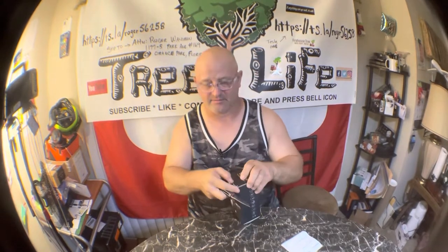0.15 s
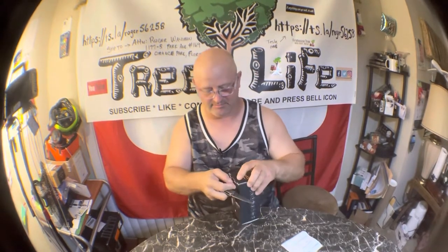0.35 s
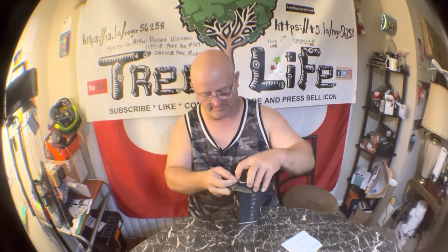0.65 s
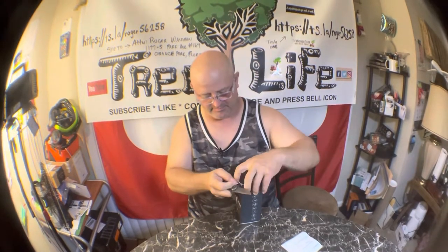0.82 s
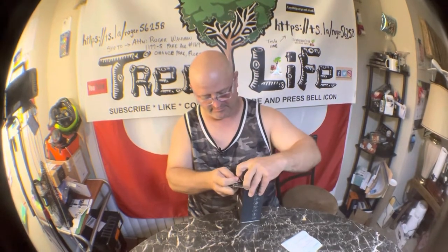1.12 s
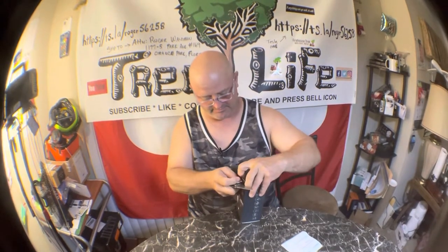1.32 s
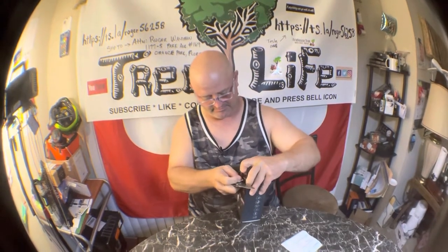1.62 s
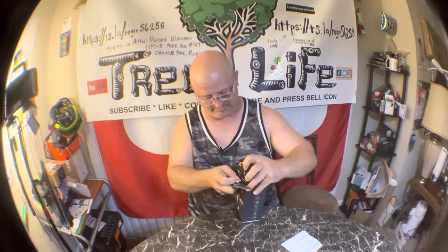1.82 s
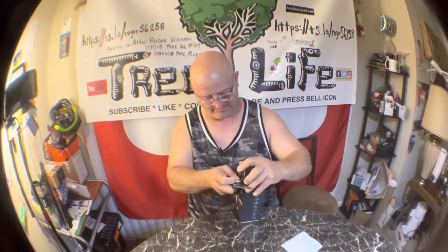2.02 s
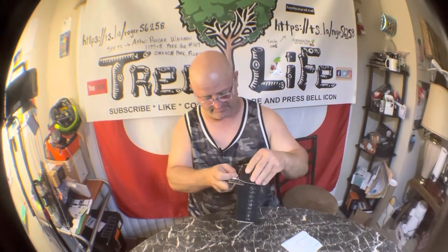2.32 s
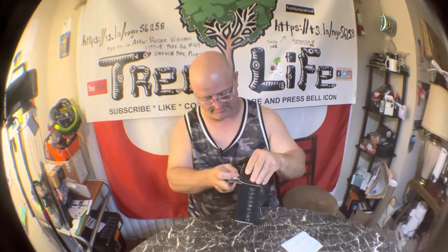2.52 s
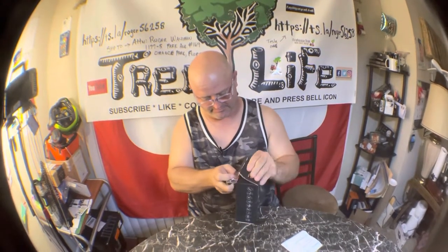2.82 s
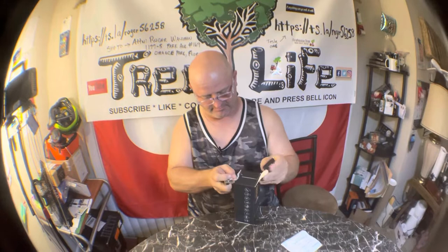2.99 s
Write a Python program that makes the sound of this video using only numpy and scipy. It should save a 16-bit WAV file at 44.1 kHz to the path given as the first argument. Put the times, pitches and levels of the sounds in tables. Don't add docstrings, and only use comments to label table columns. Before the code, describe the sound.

Cardboard box seal cut by blade: soft rubbing and faint crinkles, thickening ticks, sharp cracks midway, quieter scraping, then a hard snap with a table knock and final splintering, in a small room with short echo.

```python
import sys
import numpy as np
from scipy import signal
from scipy.fft import rfft, irfft
from scipy.io import wavfile
from scipy.ndimage import uniform_filter1d

SR = 44100
rng = np.random.default_rng(int(sys.argv[2]) if len(sys.argv) > 2 else 0)


def gain_from_db(level_db):
    decades = np.asarray(level_db, float) / 20
    return 10 ** decades


def bounce(signal):
    frames = np.transpose(np.atleast_2d(signal))
    limited = np.clip(frames, -1, 1)
    pcm = np.round(limited * 32767).astype(np.int16)
    wavfile.write(sys.argv[1], SR, pcm)


N = 138915


def evened(x):
    return x / np.sqrt(np.mean(x ** 2) + 1e-20)


def read(points, hz):
    point_hz, value = np.transpose(points)
    return np.interp(np.log(hz + 1), np.log(point_hz + 1), value)


def add(track, start_s, sound):
    part = track[round(start_s * SR):][:len(sound)]
    part += sound[:len(part)]


def play(events, make_sound):
    track = np.zeros(N)
    for start_s, *details in events:
        add(track, start_s, make_sound(*details))
    return track


def smooth_twice(x, size, axis=-1):
    return uniform_filter1d(uniform_filter1d(x, size, axis=axis), size, axis=axis)


def colour(x, points):
    level_db = read(points, abs(np.fft.fftfreq(8192, 1 / SR)))
    log_gain = np.log(gain_from_db(np.maximum(level_db, -100)))
    taps = np.fft.ifft(np.exp(np.conj(signal.hilbert(log_gain)))).real[:4096]
    return signal.oaconvolve(x, taps / np.linalg.norm(taps))[:len(x)]


def ring(hz, t60_s, t):
    swell_cycles = 0.84
    swell = (1 - np.exp(-t * hz / swell_cycles)) ** 2
    return np.sin(2 * np.pi * hz * t) * gain_from_db(-t / t60_s * 60) * swell


# pitch_hz [Hz], level_db [dB]
AIR_SPECTRUM = [(20, 12.5), (42, 7), (62, -3.5), (550, -20), (1600, -31), (4300, -46), (9000, -41.5),
                (16000, -52)]


def air():
    gain = gain_from_db(read(AIR_SPECTRUM, np.fft.rfftfreq(N, 1 / SR)))
    return gain_from_db(-35.5) * evened(irfft(rfft(rng.standard_normal(N)) * gain, N))


# pitch_hz [Hz], t60_s [s to fall 60 dB]
ECHO_TIMES = [(600, 0.17), (4000, 0.2), (12000, 0.046)]


def room(x):
    taps = np.zeros(SR // 2)
    at = np.arange(200, SR // 2 - 20, 20)
    taps[at + rng.integers(0, 20, len(at))] = rng.choice([-1., 1.], len(at))
    hz, t, bands = signal.stft(taps, SR, nperseg=256)
    fade = gain_from_db(-60 * t / read(ECHO_TIMES, hz)[:, None])
    tail = signal.istft(bands * fade, SR, nperseg=256)[1]
    return signal.fftconvolve(x, tail / np.linalg.norm(tail))[:N]


def grit(catches_per_s, spread_db, share):
    size = gain_from_db(spread_db * np.minimum(rng.exponential(1, N), 2.5))
    catches = size * (rng.random(N) < catches_per_s / SR)
    catches = signal.lfilter([1], [1, -.97], catches) * rng.standard_normal(N)
    flutter_db = 2.0 * evened(smooth_twice(rng.standard_normal(N), 300))
    return (share * evened(catches) + (1 - share) * rng.standard_normal(N)) * gain_from_db(flutter_db)


# start_s [s], length_s [s], level_db [dB]
CRINKLES = [
    (.655, 0.11, -47.5),
    (0.996, .05, -49),
    (1.22, 0.056, -49),
    (2.033, 0.12, -51.5),
]
# pitch_hz [Hz], level_db [dB per Hz]
CRINKLE_SPECTRUM = [(800, -54), (1200, 2), (2100, 4), (3000, -14), (4200, -34)]


def crinkle():
    def swell(length_s, level_db):
        return gain_from_db(level_db) * np.hanning(round(length_s * SR)) ** .5

    return play(CRINKLES, swell) * evened(colour(grit(700, 3.5, .6), CRINKLE_SPECTRUM))


# start_s [s], length_s [s], from_hz [Hz], to_hz [Hz], level_db [dB]
SQUEAKS = [
    (.57, .06, 14100, 15900, -69),
    (.795, .025, 15800, 14000, -68),
]


def squeak(length_s, from_hz, to_hz, level_db):
    hz = np.linspace(from_hz, to_hz, round(length_s * SR))
    return gain_from_db(level_db) * np.hanning(len(hz)) ** .5 * np.sin(2 * np.pi * np.cumsum(hz) / SR)


def patchy(x, patch_db):
    bands = signal.stft(x, nperseg=256)[2]
    field = rng.standard_normal(bands.T.shape)
    field = uniform_filter1d(uniform_filter1d(field, size=14, axis=0), size=7, axis=1)
    return evened(signal.istft(bands * gain_from_db(patch_db * evened(field).T), nperseg=256)[1][:N])


def linger(level):
    let_go_s = 0.011
    keep = np.exp(-1 / (let_go_s * SR))
    return np.maximum(level, signal.lfilter([1 - keep], [1, -keep], level))


# start_s [s], length_s
# [s], hiss_db [dB], card_db [dB], peak_place [0-1 of the stroke]
STROKES = [(0.0, 0.27, -53.5, -57, 0.04), (0.09, 0.1, -44, -35.5, 0.58), (0.171, 0.12, -52, -43, .3),
           (0.264, 0.12, -53.5, -48, 0.29), (0.363, 0.039, -56, -46, 0.47), (0.384, 0.14, -47.5, -48, 0.55),
           (0.486, 0.11, -50.5, -50, 0.33), (0.558, 0.15, -54, -49, 0.38), (0.652, 0.082, -44, -40.5, 1),
           (0.748, 0.053, -57.5, -49, 0.43), (0.805, 0.11, -44, -47, 0.33), (0.9, 0.1, -52.5, -45, 0),
           (0.999, 0.21, -52.5, -45, 0), (1.142, 0.12, -56, -45.5, 0.64), (1.224, 0.046, -44, -38, 0.65),
           (1.276, 0.16, -71, -54.5, 0.07),
           (1.5187, 0.037, -39.5, -30.5, 0.66), (2.75, 0.031, -40.5, -35, 0.35),
         (1.538, 0.21, -42, -35.5, 0.15), (1.697, 0.085, -43, -35.5, 0.86), (1.79, 0.082, -43, -38, 0),
         (1.854, 0.47, -61, -48, 0), (1.997, 0.13, -50.5, -51, 1), (2.138, 0.18, -52.5, -43.5, 0.8),
         (2.283, 0.14, -45, -48.5, 0.71), (2.398, 0.17, -60, -49, 0.31), (2.496, 0.14, -53, -45, 0.31),
         (2.55, 0.29, -47.5, -38, 0.91), (2.772, 0.17, -58, -49.5, 0.48), (2.852, 0.15, -46, -55, 0.8),
         (2.976, 0.059, -46.5, -53, 0.4), (3.021, 0.12, -55, -75, 0.12)]
# pitch_hz [Hz], level_db [dB per Hz]
HISS_SPECTRUM = [(1800, -33), (3200, -11), (4500, -12.5), (5700, -3), (8200, -0.5), (10500, -3),
                 (12500, -13), (16000, -16.5)]
# pitch_hz [Hz], level_db [dB per Hz]
CARD_SPECTRUM = [(88, -18.5), (150, -7.5), (556, 0), (851, -11), (1120, -3.5), (1380, -6), (1730, -7),
                 (2370, -13), (4500, -25), (5850, -30), (9900, -120)]


def strokes():
    hiss_level, card_level = np.zeros(N), np.zeros(N)
    for start_s, length_s, hiss_db, card_db, peak in STROKES:
        u = np.linspace(0, 1, round(length_s * SR))
        peak = np.clip(peak, .05, .95)
        rise_and_fall = np.minimum(u / peak, (1 - u) / (1 - peak))
        shape = np.sin(np.pi / 2 * rise_and_fall) ** 1.72
        add(hiss_level, start_s, gain_from_db(hiss_db) * shape)
        add(card_level, start_s, gain_from_db(card_db) * shape)
    fizz = patchy(colour(grit(810, 9.5, 0.19), HISS_SPECTRUM), 2.2)
    rasp = patchy(colour(grit(600, 1.9, 0.38), CARD_SPECTRUM), 2.2)
    return linger(hiss_level) * fizz + linger(card_level) * rasp


# pitch_hz [Hz], level_db [dB], t60_s [s to fall 60 dB]
BOX_MODES = [(640, -19, 0.0079), (1100, -11, 0.048), (1850, -3.5, 0.017), (2662, -7.5, 0.014),
             (3430, -21.5, 0.033)]
# pitch_hz [Hz], level_db [dB per Hz]
CRACK_SPECTRUM = [(1800, -36.5), (3300, -10), (4500, -11.5), (5700, -3), (8200, -0.5), (11500, -7.5),
                  (16000, -12.5)]
BLADE_HZ = 8350


def click(crack_db, card_db, card_hz, thud_db, length=1, blade=.25, blade_hz=BLADE_HZ, rise_s=0.0016,
          tone=CRACK_SPECTRUM):
    t = np.arange(3000) / SR
    bends = rng.uniform(0.919, 1.087, len(BOX_MODES))
    crack_t60_s, ping_t60_s, thud_t60_s, thud_hz = length * 0.0048, 0.011, 0.016, 217.4

    burst = rng.standard_normal(len(t)) * gain_from_db(-60 * t / crack_t60_s)
    crack = colour(burst * (1 - np.exp(-t / rise_s)) ** 2, tone)
    crack = crack / abs(crack).max() + blade * ring(blade_hz * bends[3] ** .5, crack_t60_s, t)

    box = sum(gain_from_db(db) * ring(hz * bend, t60_s, t) for (hz, db, t60_s), bend in zip(BOX_MODES, bends))
    card = ring(card_hz, ping_t60_s, t) + 0.34 * ring(3000 * bends[2], ping_t60_s / 2, t)
    card = card + gain_from_db(-9.5) * box

    thud = ring(thud_hz * bends[0], thud_t60_s, t)
    thud = thud + 0.44 * ring(2.374 * thud_hz * bends[1], thud_t60_s, t)
    parts = ((crack, crack_db + 1.5), (card, card_db + 0.5), (thud, thud_db + 2))
    return sum(gain_from_db(db) * x / abs(x).max() for x, db in parts)


# start_s [s], crack_db [dB], card_db [dB], card_hz [Hz], thud_db [dB]
TICKS = [(0.2124, -50, -30.5, 1350, -54), (0.3276, -50, -34.5, 1140, -29.5),
         (0.3338, -47, -33.5, 1330, -30.5), (0.3763, -50, -37, 1100, -40), (0.417, -47, -35.5, 1260, -36),
         (0.466, -52, -31.5, 1580, -37.5), (0.6639, -50, -37.5, 1360, -39), (0.6777, -49, -34, 1160, -37),
         (0.82, -51, -36.5, 1240, -52), (0.9045, -31.5, -24, 1164, -22.5),
         (0.9115, -36, -21.5, 1630, -25.5), (1.0147, -37.5, -26, 1180, -51), (1.0435, -39, -42, 1550, -36),
         (1.075, -43, -49, 1310, -36), (1.0934, -47, -43, 1770, -49), (1.1084, -29, -36.5, 1420, -35.5),
         (1.1463, -37, -28, 1490, -43), (1.1627, -30, -28, 1660, -32), (1.1818, -31, -26.5, 1460, -55),
         (1.2028, -30, -32, 1570, -34.5), (1.2268, -37, -33, 990, -32), (1.2456, -23.5, -53, 1550, -50),
         (1.291, -53, -44, 1250, -43), (1.3282, -40.5, -38.5, 1400, -34.5), (1.3548, -62, -43.5, 1560, -46),
         (1.4374, -43.5, -41.5, 1350, -35), (1.4825, -47, -39, 1080, -36), (1.4965, -49, -46, 2280, -48),
         (1.5900, -32, -45, 1400, -47), (1.7419, -28, -39, 1940, -47), (1.9848, -43, -37, 1800, -42),
              (2.0981, -40.5, -30, 1580, -60), (2.7245, -29, -29, 1310, -50),
              (1.9564, -30.5, -33.5, 1760, -41), (2.0095, -25, -34, 1330, -37.5),
              (2.038, -41, -30.5, 1570, -35.5), (2.2184, -58, -34.5, 1430, -33.5),
              (2.2337, -33, -33, 1230, -44), (2.2743, -31.5, -25, 1354, -37),
              (2.5134, -29.5, -21.5, 1310, -32), (2.5519, -22.5, -26, 1430, -26),
              (2.5701, -37, -27, 1540, -33), (2.718, -26.5, -19.5, 1330, -32),
              (2.8696, -27, -32.5, 1490, -38), (3.0228, -56, -32, 1310, -39)]


def tick(crack_db, card_db, card_hz, thud_db):
    return click(crack_db, card_db, card_hz, thud_db, blade=0.64, rise_s=0.00073, tone=HISS_SPECTRUM)


# start_s [s], crack_db [dB]
SLIPS = [(.1080, -25.5), (0.1101, -36), (0.1153, -30), (0.118, -26), (0.123, -24), (0.1249, -25),
         (0.1272, -21.5), (0.1324, -22.5), (0.1371, -30), (0.1394, -27), (0.142, -23), (0.146, -26),
         (0.149, -18), (.1530, -18), (0.1575, -21), (0.1627, -19.5)]


def slip(crack_db):
    card_hz = 1276 * rng.uniform(0.935, 1.105)
    return click(crack_db, -28, card_hz, -40, length=0.58, blade=1.8, blade_hz=8600,
                 rise_s=0.00015, tone=HISS_SPECTRUM)


# start_s [s], crack_db [dB], blade_hz [Hz]
SPLINTERS = [
    (2.974, -28, 10100),
    (2.9782, -14.5, 9330),
    (2.9844, -20, 10800),
    (2.9905, -27, 10500),
    (2.9934, -33, 9500),
    (2.996, -26, 8500),
    (2.9996, -22, 8050),
    (3.003, -23.5, 6360),
]


def splinter(crack_db, blade_hz):
    return click(crack_db, crack_db - 21, 1440, crack_db - 42, length=1.4, blade=1.0,
                 blade_hz=blade_hz, rise_s=0.00015)


def bump():
    t = np.arange(SR // 4) / SR
    knock = ring(117, 0.069, t + 0.0035) * np.minimum(t / 0.0024, 1)
    return gain_from_db(-7) * (knock + 1.2 * ring(681, 0.032, t))


# start_s [s], pitch_hz [Hz], peak_db [dB], t60_s [s; each note swells and stops within 0.42 of this]
RINGS = [(0.9297, 1510, -33.5, .01), (1.5314, 1174, -8, 0.016), (1.5332, 2760, -18, 0.022),
         (1.5328, 5040, -15.5, 0.0085), (1.5328, 6270, -19.5, 0.02), (1.6092, 1830, -25, 0.019),
         (1.6082, 5650, -24, .006), (1.6590, 2960, -14.5, 0.015), (1.6621, 3220, -18, .014),
         (1.6607, 5315, -17, 0.014), (1.783, 1750, -30, 0.027), (1.7893, 7320, -11.5, 0.0087),
         (1.7894, 8650, -17.5, 0.0093), (1.7946, 208, -18.5, 0.028), (2.7541, 8600, -13, 0.0066),
         (2.7558, 6300, -5.5, 0.0056), (2.7639, 1185, -8, 0.02), (2.7755, 5770, -37, 0.0062),
         (2.7904, 1140, -23.5, 0.041)]


def swelling_note(hz, peak_db, t60_s):
    held_s = 0.42 * t60_s
    t = np.arange(0, held_s, 1 / SR)
    swell = np.sin(np.pi * (t / held_s) ** 0.5) ** 2
    return gain_from_db(peak_db) * np.sin(2 * np.pi * hz * t) * swell


# start_s [s], crack_db [dB], card_db [dB], card_hz [Hz], thud_db [dB]
SNAPS = [(1.5323, -6, 1.5, 1426, -12), (1.5354, -18, -8.5, 1775, -37), (1.6082, -10, -17.5, 1200, -24.5),
         (1.6583, -7.5, -8.5, 1300, -32), (1.6620, -6, -11, 1323, -22.5), (1.7601, -23, -16, 1650, -39),
         (1.7894, -15, -7.5, 1850, -31), (1.7972, -19.5, -41, 1820, -36), (2.7541, -7, -8, 1430, -15.5),
         (2.7567, -1.5, -5.5, 1100, -16.5), (2.7629, -19.5, -13, 1230, -26)]


def snaps():
    return play(SNAPS, click)


def scene():
    box = strokes() + play(SQUEAKS, squeak)
    box += play(TICKS, tick)
    box += play(SLIPS, slip) + play(SPLINTERS, splinter)
    box += snaps()
    add(box, 2.755, bump())
    rings = play(RINGS, swelling_note)
    echo = gain_from_db(-16.5) * room(box + gain_from_db(-10) * rings)
    return (air() + echo + crinkle() + box + rings)[None]


def band_limit(x):
    return signal.sosfilt(signal.butter(12, 16830, fs=SR, output="sos"), x)


def record(dry):
    mix = .96 * dry / (1 + dry ** 4) ** .25
    mix = signal.sosfilt(signal.butter(12, 16300, fs=SR, output="sos"), mix)
    mix = signal.sosfilt(signal.ellip(6, .5, 20, 15900, fs=SR, output="sos"), mix)
    return band_limit(mix)


dry = scene()
out = record(dry)
bounce(out)
```